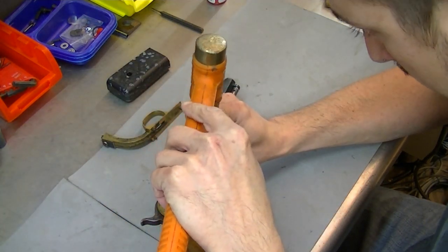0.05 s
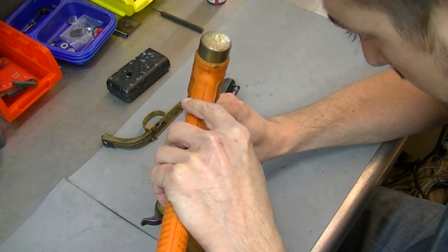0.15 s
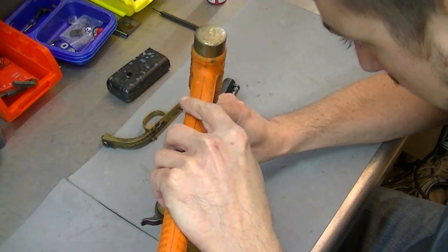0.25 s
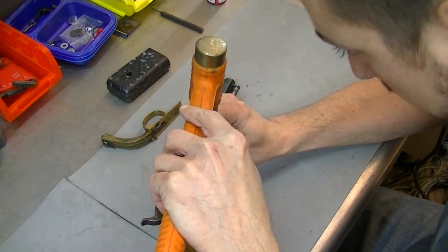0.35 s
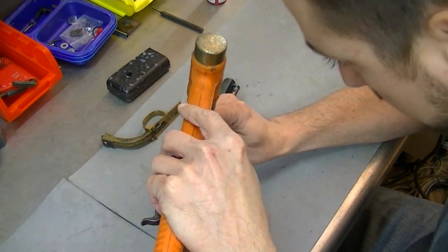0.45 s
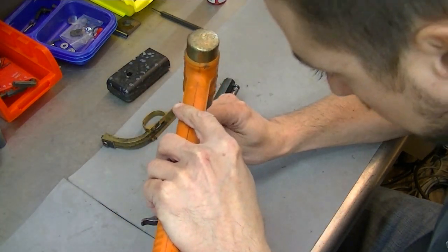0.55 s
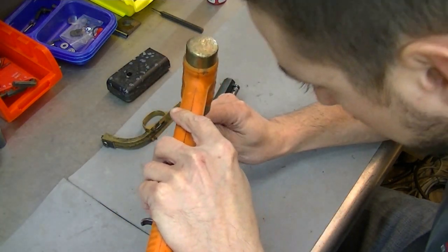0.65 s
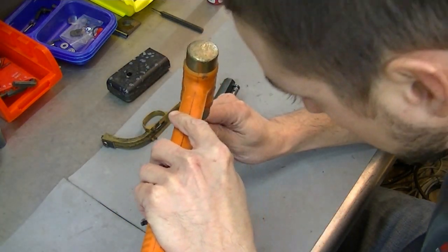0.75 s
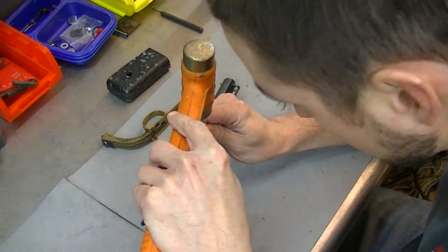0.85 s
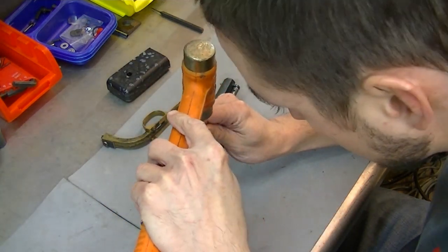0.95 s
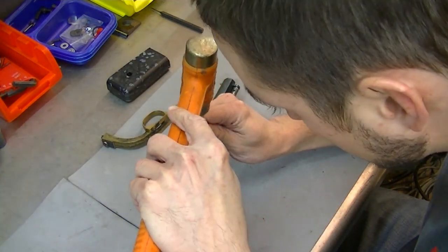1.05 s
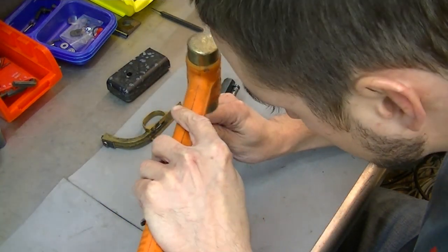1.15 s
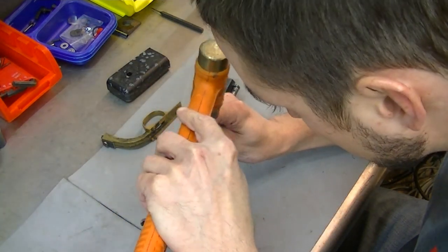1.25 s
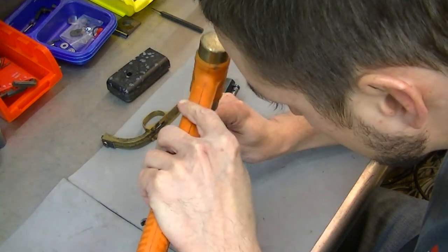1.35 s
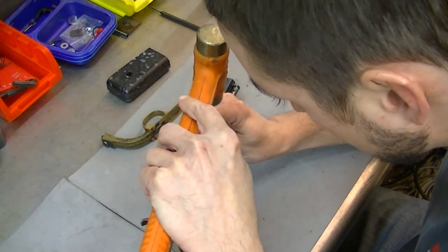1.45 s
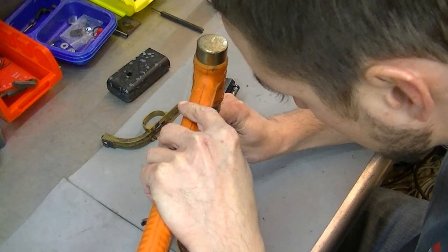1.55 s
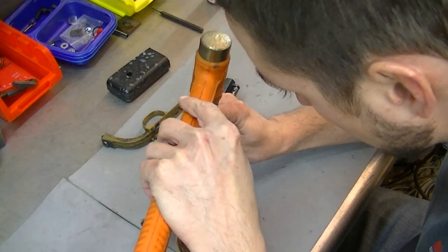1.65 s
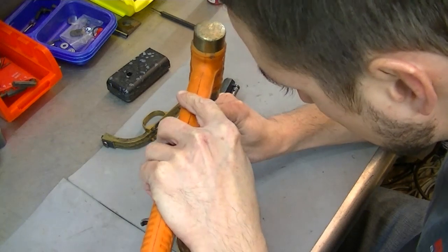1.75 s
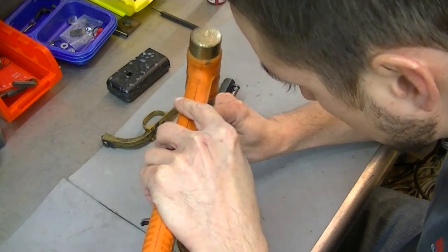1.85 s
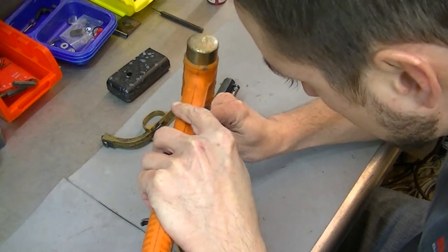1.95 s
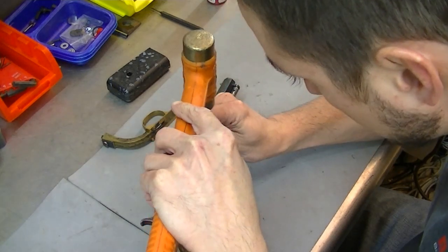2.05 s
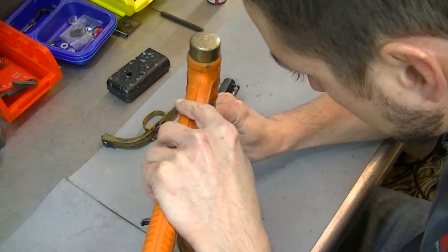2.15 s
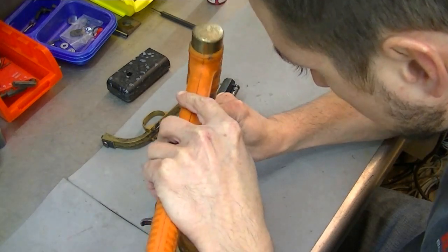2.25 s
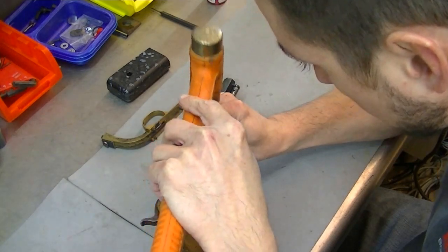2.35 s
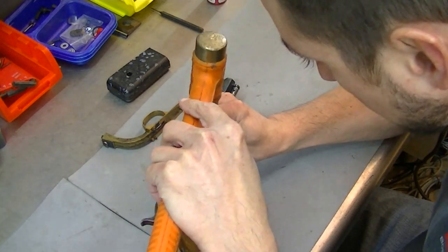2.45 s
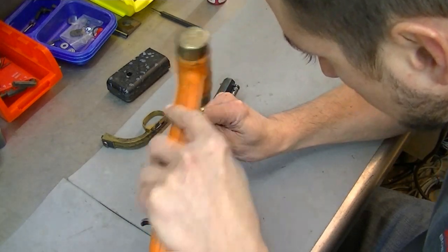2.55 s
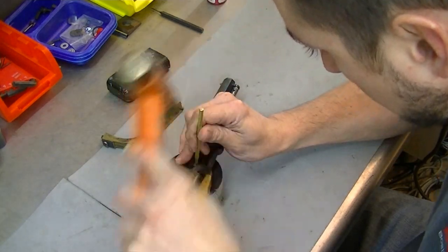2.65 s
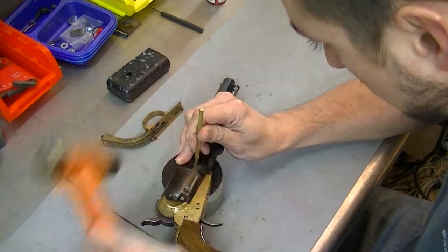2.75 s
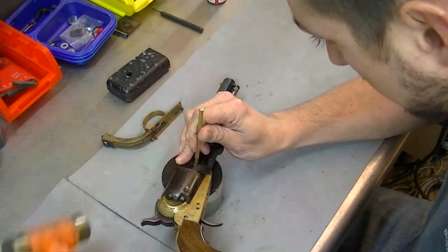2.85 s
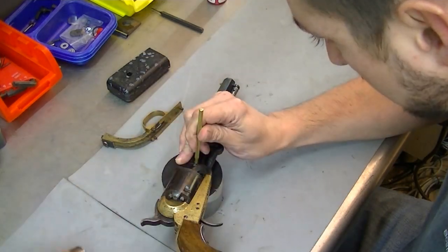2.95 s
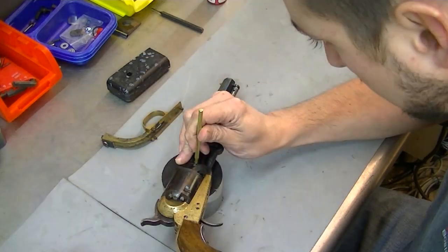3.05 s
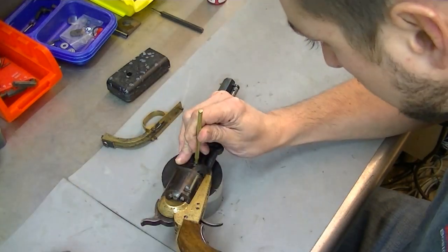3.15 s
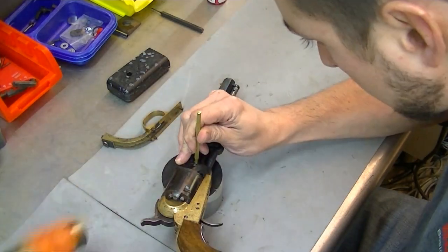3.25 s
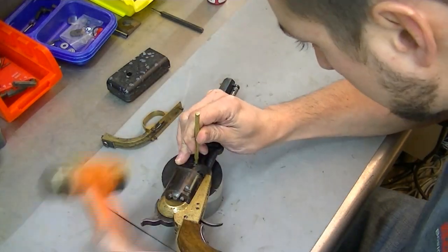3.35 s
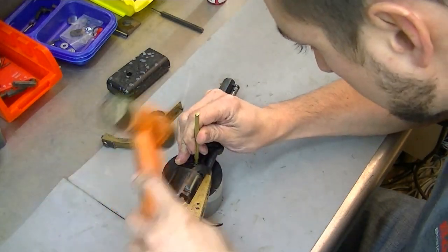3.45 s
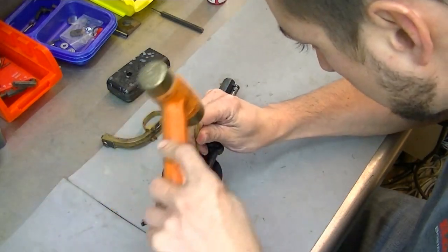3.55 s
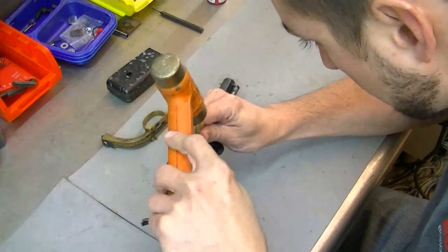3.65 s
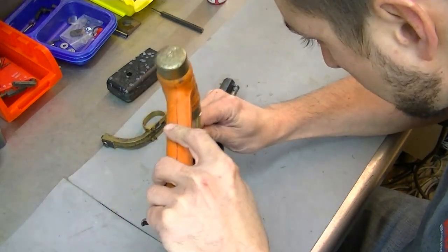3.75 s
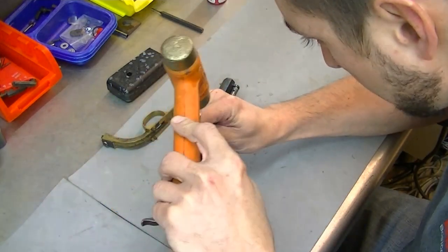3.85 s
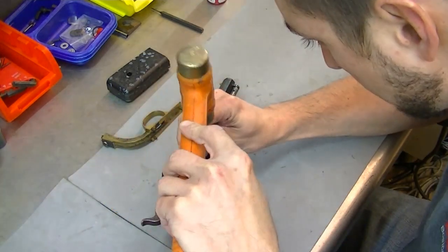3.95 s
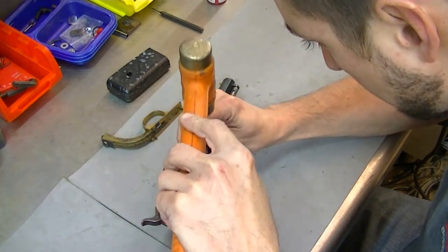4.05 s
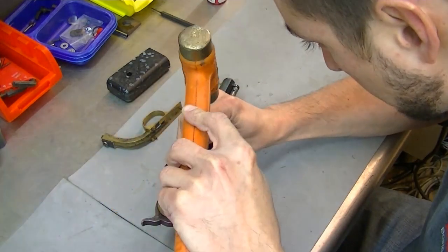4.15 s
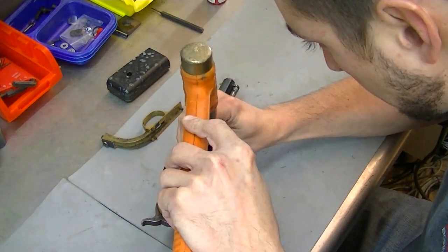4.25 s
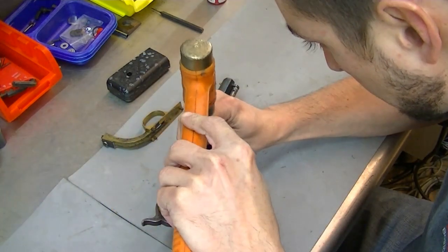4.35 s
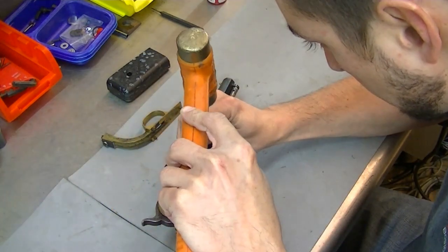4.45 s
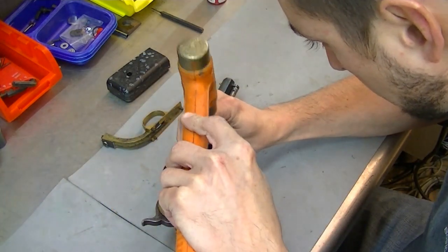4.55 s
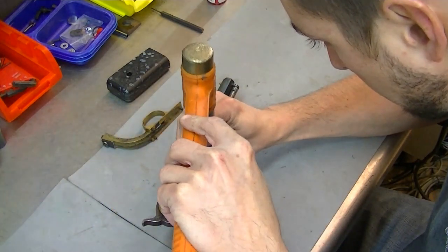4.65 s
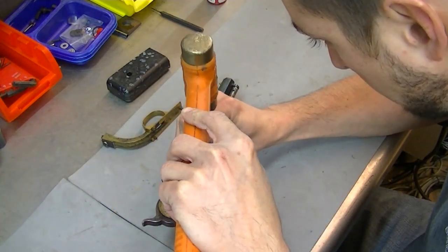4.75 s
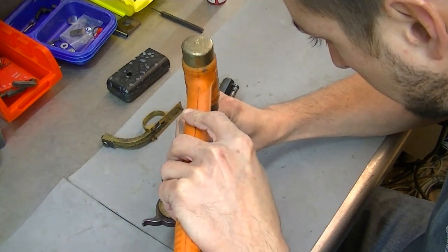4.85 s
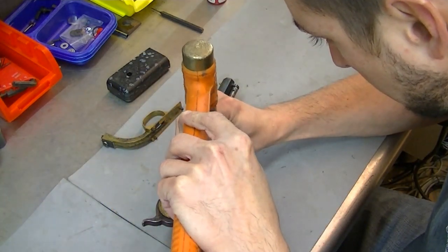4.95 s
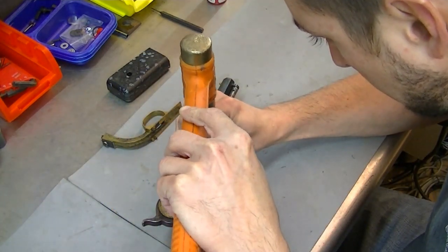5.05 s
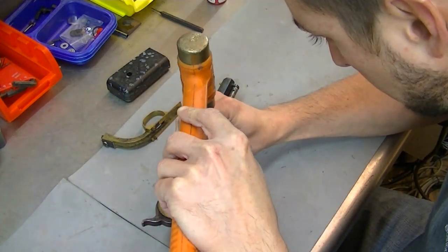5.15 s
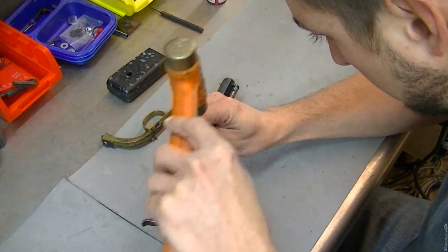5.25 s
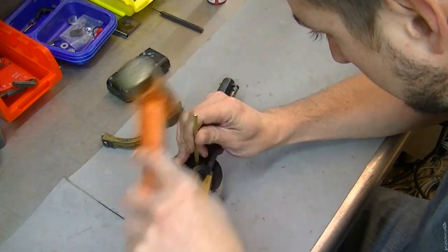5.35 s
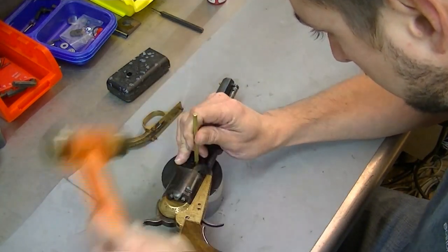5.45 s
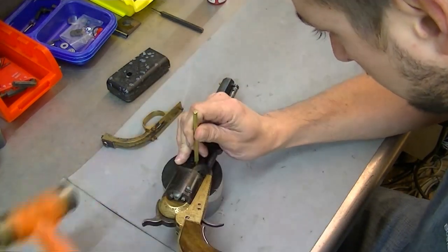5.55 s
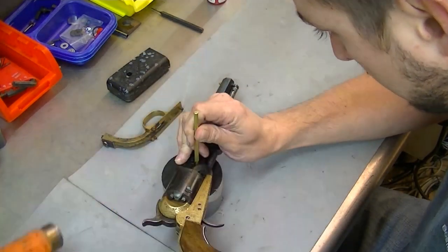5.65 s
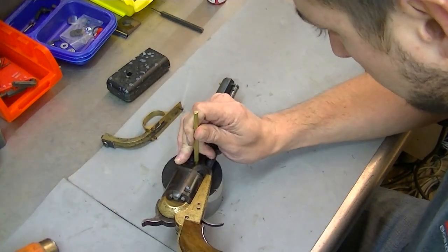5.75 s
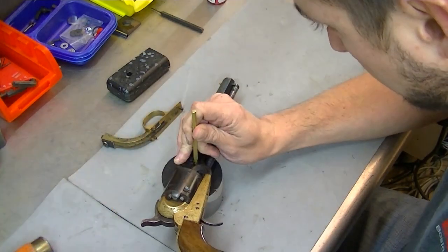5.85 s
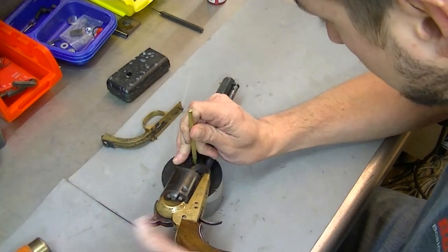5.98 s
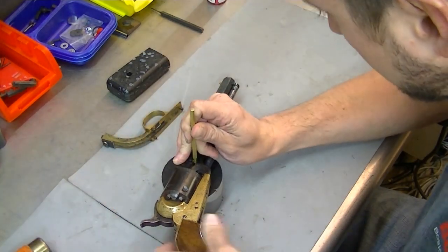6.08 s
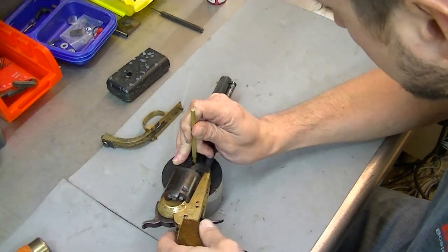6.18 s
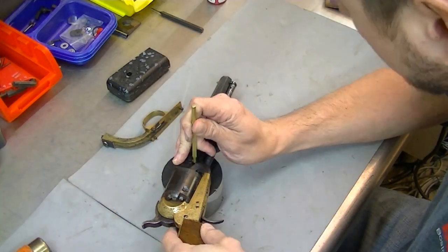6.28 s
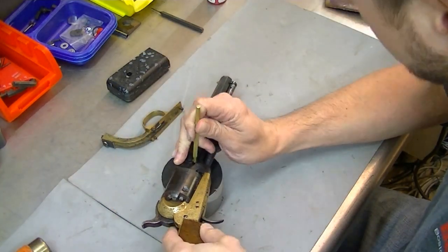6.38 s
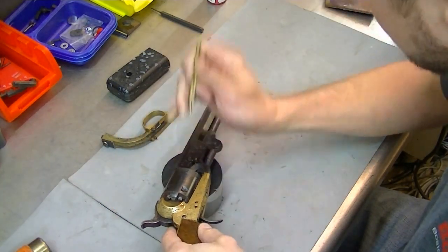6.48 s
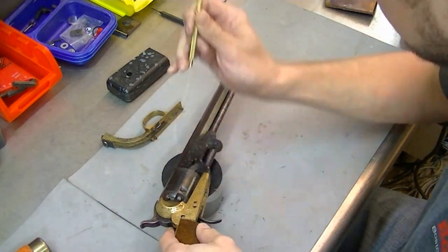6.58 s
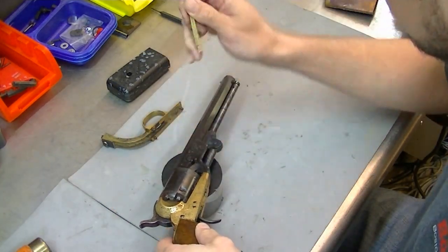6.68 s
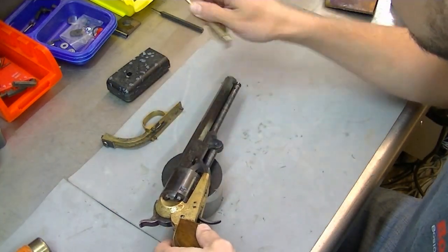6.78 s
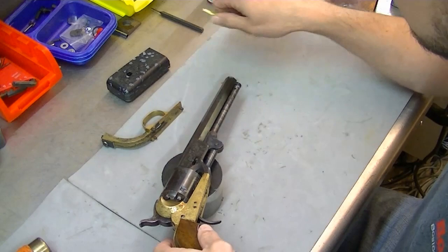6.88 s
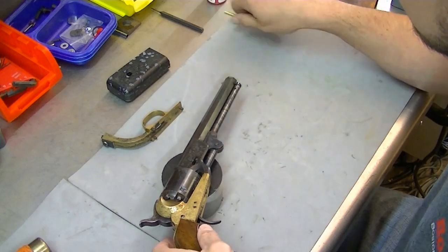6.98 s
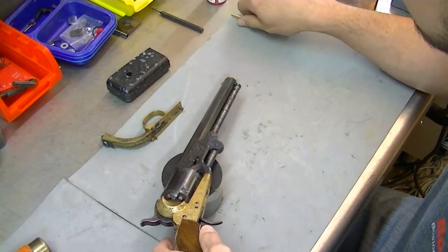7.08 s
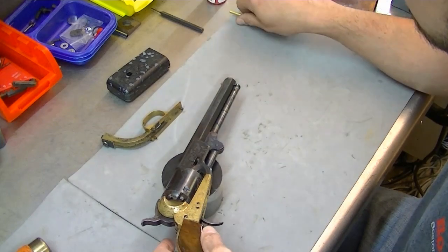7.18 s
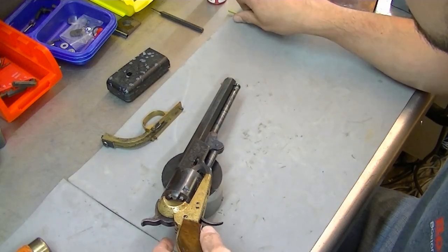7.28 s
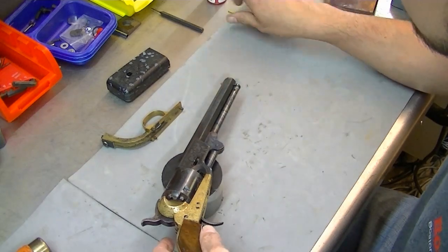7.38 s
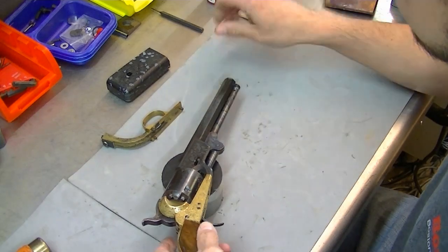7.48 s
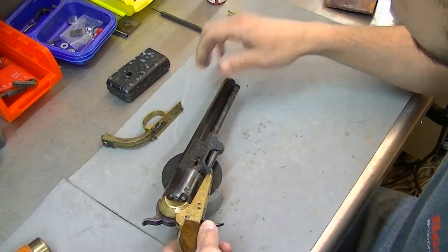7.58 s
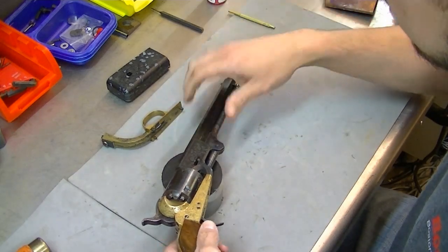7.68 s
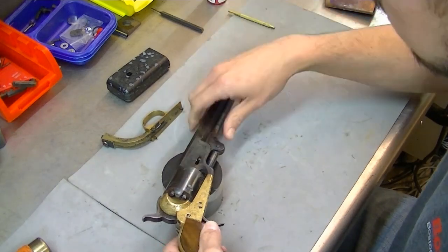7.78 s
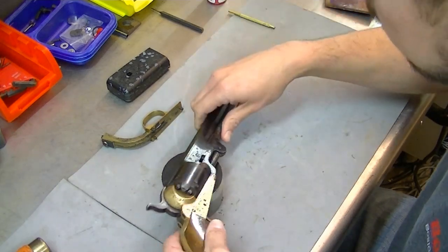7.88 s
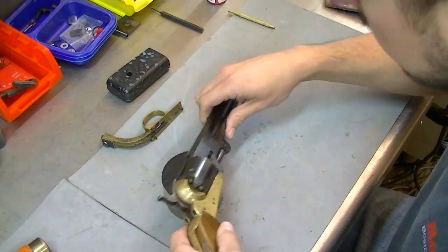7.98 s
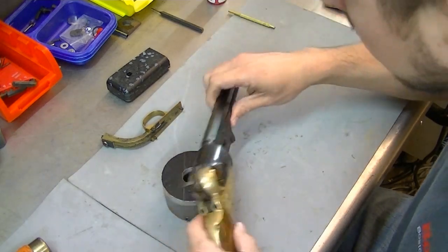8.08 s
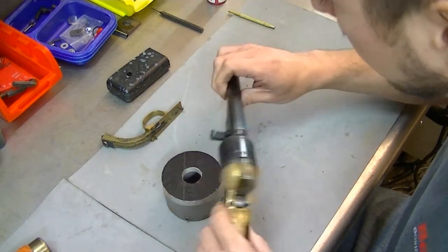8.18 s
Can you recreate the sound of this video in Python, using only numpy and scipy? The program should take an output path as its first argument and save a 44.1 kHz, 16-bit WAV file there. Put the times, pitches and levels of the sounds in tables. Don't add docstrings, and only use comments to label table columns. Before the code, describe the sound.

A close camera microphone in a small hard room picks up faint hiss and electric lamp buzz. The tail of an earlier strike is still dying as hard ringing hammer blows on a brass punch land at 0.06 and 0.4 s, thudding in the bench and rattling loose tools. A weak graze comes at 0.93, a firm ticking hit at 1.25, then strong clangs at 1.57 and 2.14 and a softer one at 2.43, with a loose part jingling as it bounces until 2.6. Near quiet follows, with a faint brush around 3.1. Lighter, clickier taps come at 3.67, 4.0, 4.3 and 4.63, with small jingles, then a fuller thud at 4.95. Slight handling scuffs at 5.8 lead into the hammer laid down with a hollow boom and rattle at 5.95, settling at 6.02. Soft taps follow at 6.2 and 6.45, then sliding rubs and a dull tap around 7.1-7.4, fading to background.

```python
import sys
import numpy as np
from scipy import signal
from scipy.fft import rfft, irfft
from scipy.io import wavfile
from scipy.ndimage import uniform_filter1d

SR = 44100
rng = np.random.default_rng(int(sys.argv[2]) if len(sys.argv) > 2 else 0)


def boost_factor(decibels):
    exponent = np.asarray(decibels, float) / 20
    return 10 ** exponent


def persist_wave(psi):
    counts = np.round(np.clip(psi, -1, 1) * 32767).astype(np.int16)
    wavfile.write(sys.argv[1], SR, np.atleast_2d(counts).T)


N = 362502
LEAD = SR // 2
T = np.arange(SR // 2) / SR
FULL_SHAKE_DB = -12


def evened(x):
    return x / np.sqrt(np.mean(x ** 2) + 1e-20)


def read(points, hz):
    f, value = np.transpose(points)
    return np.interp(np.log(hz + 1), np.log(f + 1), value)


def coloured(x, points):
    gain = boost_factor(read(points, np.fft.rfftfreq(len(x), 1 / SR)))
    return evened(irfft(rfft(x) * gain, len(x)))


def add(mix, s, sound):
    part = mix[LEAD + round(s * SR):][:len(sound)]
    part += sound[:len(part)]


def struck(modes, spread_db, rise, shorter=1, favour_hz=None, favour_db=0):
    hz, db, t60 = np.transpose(modes)[:, :, None]
    level_luck, pitch_luck, phase_luck, rate_luck, throb_luck = rng.standard_normal((5, len(hz), 1))
    db = db + spread_db * level_luck
    if favour_hz:
        db = db + favour_db * np.exp(-(np.log(hz / favour_hz) / 0.26) ** 2)
    t = T[:round(t60.max() * shorter * SR)]
    flutter_db, flutter_hz = 4, 45 * 2 ** (rate_luck / 2)
    db = db + flutter_db * np.sin(2 * np.pi * flutter_hz * t + 3 * throb_luck)
    pitch = hz * (1 + 0.00386 * pitch_luck)
    ring = boost_factor(db - 60 * t / (t60 * shorter)) * np.sin(2 * np.pi * pitch * t + 3 * phase_luck)
    ring = ring.sum(0) * (1 - np.exp(-t / rise))
    return np.pad(ring / abs(ring).max(), (0, len(T) - len(t)))


# (frequency [Hz], density [dB per Hz])
TOOL_COLOUR = [(100, -48), (250, -14), (600, -3), (1200, -5.5), (6000, -11), (9000, -18.5), (12000, -25),
               (15000, -30.5)]


def clatter(t60, rise, clumps_db, points=TOOL_COLOUR, tilt_db=0):
    clumps = evened(uniform_filter1d(uniform_filter1d(rng.standard_normal(len(T)), 60), 60))
    colour = [(hz, db + tilt_db * np.log2(hz / 3000)) for hz, db in points]
    knocks = coloured(rng.standard_normal(len(T)), colour)
    swell_db = clumps_db * 2 * np.tanh(clumps / 2)
    return knocks * boost_factor(swell_db - 60 * T / max(t60, .003)) * (1 - np.exp(-T / rise))


# (time [s], thud level [dB], thud pitch [Hz], ring level [dB], shake level [dB])
BLOWS = [(0.0616, -26.5, 554, -22, -13.5), (0.3895, -25.5, 586, -21.5, -12.5),
         (0.9277, -30, 539, -35.5, -24.5), (1.2527, -30.5, 793, -32.5, -14.5),
         (1.5677, -25.5, 542, -20.5, -10), (2.1381, -23.5, 576, -19, -13.5), (2.4254, -30, 584, -26, -13),
         (3.6675, -32.5, 743, -47.5, -25.5), (4.011, -36.5, 563, -36.5, -15), (4.0294, -44, 869, -34, -20),
         (4.2992, -35, 643, -45.5, -24.5), (4.631, -44.5, 574, -48, -29), (4.6554, -35, 442, -43, -20.5),
         (4.9533, -22.5, 574, -33, -13), (5.9535, -30.5, 603, -35.5, -10.5),
         (6.0196, -32, 309, -38.5, -14.5)]
EARLIER_BLOW = (-0.18, -32, 480, -24, -14)
# (frequency [Hz], level [dB], t60 [s])
BENCH = [(200, -14, 0.09), (283, -27, .8), (307.2, -14, 0.17), (398.5, -1.5, 0.14), (443, -14, 1),
         (466.6, 4.5, 0.13), (521.4, -5.5, 0.21), (589.6, 0, .15), (672.7, 1, 0.092), (753.5, -1, 0.2),
         (869, -6, 0.077)]
# (frequency [Hz], level [dB], t60 [s])
FRAME = [(1056, -6.5, 0.07), (1198, 0, 0.11), (1400, -2, 0.012), (1528, -5.5, 0.073), (1846, -11.5, 0.031),
         (1985, 0.5, 0.065), (2396, -1.5, 0.031), (2870, -4.5, 0.06), (4200, -8.5, 0.04)]
# (frequency [Hz], level [dB], t60 [s])
PUNCH = [(3050, -6, .02), (3110, -2, .03), (3171, 0, .035), (3240, -4, .02), (3313, -1, .025),
         (3388, -2, .02), (3470, -5, .02), (3560, -7, .015)]


def blow(thud_db, thud_hz, ring_db, shake_db):
    less = shake_db - FULL_SHAKE_DB
    board = [(thud_hz, 9, .12), (thud_hz * 1.06, 5, .08), (thud_hz * .93, 4, .08)]
    thud = boost_factor(thud_db + 5) * struck(BENCH + board, spread_db=2.5, rise=0.0013)
    knock = boost_factor((thud_db + shake_db) / 2 - 6) * struck(FRAME, spread_db=2, rise=.0015)
    ring = boost_factor(ring_db + 6.5) * struck(PUNCH, spread_db=3.5, rise=.003)
    crack = boost_factor(-18 + 1.36 * less) * clatter(t60=.015, rise=.001, clumps_db=-1.5, tilt_db=0.13 * less)
    return thud + knock + ring + crack + chatter(shake_db)


# (time [s], level [dB], strongest pitch [Hz])
TICKS = [
    (0.9293, -31.5, 2920),
    (1.2527, -17, 3260),
    (3.6679, -21.5, 4070),
    (4.011, -20.5, 4250),
    (4.2999, -14, 3030),
    (4.366, -29, 2930),
    (4.6311, -14.5, 4360),
    (5.817, -43, 5000),
]
# (frequency [Hz], level [dB], t60 [s])
TIP = [(2506, -0.5, 0.0094), (3166, 2, 0.017), (4010, -1, 0.015), (5120, -5.5, 0.0033), (6150, -11, 0.012),
       (6840, -4, 0.027), (7300, -10.5, 0.0047), (8260, -16, 0.013)]


def tick(level_db, hz):
    less = max(level_db - FULL_SHAKE_DB, -14)
    modes = [(f, db + 0.03 * less * np.log2(f / 3000), t60) for f, db, t60 in TIP]
    modes.append((hz, 5, .012))
    click = clatter(t60=0.017, rise=.0004, clumps_db=-0.1, tilt_db=4.5 + .4 * less)
    tip = struck(modes, spread_db=4, rise=0.0002)
    return boost_factor(level_db - 3) * (tip + boost_factor(1 + 1.6 * less) * click)


# (time [s], shake level [dB])
CHATTERS = [
    (1.3458, -26),
    (1.6644, -19),
    (4.3202, -29.5),
    (4.3444, -33),
    (4.6653, -27),
    (5.9386, -23.5),
    (7.09, -45),
    (7.342, -34.5),
]


def chatter(shake_db):
    less = shake_db - FULL_SHAKE_DB
    t60 = 0.23 * 2 ** (max(less, -14) / 14)
    return boost_factor(shake_db - 11) * clatter(t60, rise=0.0028, clumps_db=4, tilt_db=max(0.13 * less, -6))


# (time [s], jingle level [dB])
BOUNCES = [(1.31, -30.5), (1.346, -29), (1.375, -34.5), (1.5844, -20), (1.7541, -30.5), (2.4464, -26),
           (2.4916, -23), (2.5299, -27.5), (2.5512, -28), (2.5881, -29), (2.6156, -32), (4.0735, -27.5),
           (4.1091, -25.5), (4.366, -25.5), (4.4072, -28), (4.4575, -41), (4.7113, -36), (4.7436, -35)]
# (frequency [Hz], level [dB], t60 [s])
PART = [(1303, -9, .04), (1997, -2, .04), (2955, -5, .04), (4290, -5, .035), (4560, -5, .05),
        (5200, -8, .03), (5884, -8, .03), (6051, -4, .04), (7407, -11, .03), (8183, -14, .03),
        (9889, -13, .025), (11990, -20, .025), (13150, -18, .025), (14140, -20, .03)]


def bounce(jingle_db):
    jingle = boost_factor(jingle_db) * struck(PART, spread_db=3, rise=0.0022)
    return jingle + boost_factor(jingle_db - 4) * clatter(t60=0.054, rise=0.0023, clumps_db=1.5, tilt_db=1.5)


# (time [s], thump level [dB])
LANDINGS = [
    (5.9535, -26),
    (6.0196, -39.5),
]
# (frequency [Hz], level [dB], t60 [s])
PLANK = [(93.3, -7.5, 0.16), (131, -2.5, 0.15), (182, -5, 0.15), (248, -3, 0.099), (293, -0.5, .2),
         (304, 6.5, 0.16), (321, 2.5, 0.14), (603, 4, 0.15)]


def landing(thump_db):
    return boost_factor(thump_db) * struck(PLANK, spread_db=0.5, rise=0.0028)


# (time [s], tap level [dB], tap pitch [Hz], scuff level [dB])
TOUCHES = [(0.945, -33.5, 805, -76), (1.2527, -21, 1185, -60), (3.16, -60.5, 2060, -65),
           (3.72, -38.5, 700, -67), (3.785, -49.5, 755, -73), (4.892, -58, 474, -60),
           (5.383, -51, 436, -78), (5.797, -61, 570, -71), (5.818, -48.5, 583, -57),
           (5.841, -44, 1910, -55), (5.877, -57, 370, -44), (6.184, -42, 300, -56), (6.352, -58, 380, -63),
           (6.455, -41.5, 602, -55.5), (6.489, -59, 445, -56.5), (7.093, -58, 440, -59),
           (7.345, -38.5, 322, -53.5), (7.857, -70, 603, -56.5)]
# (frequency [Hz], density [dB per Hz])
SCUFF = [(1500, -11), (4000, -4.5), (8000, -4), (13000, -7.5), (16000, -3)]


def touch(tap_db, tap_hz, scuff_db):
    tap = struck(BENCH + FRAME, spread_db=0.5, rise=0.00028, shorter=0.49, favour_hz=tap_hz, favour_db=13.5)
    scuff = clatter(t60=.055, rise=0.0014, clumps_db=5, points=SCUFF)
    return boost_factor(tap_db + 2.5) * tap + boost_factor(scuff_db - 2.5) * scuff


# (time [s], length [s], level [dB])
SLIDES = [
    (3.1, .1, -76),
    (5.8, 0.16, -68),
    (7.085, .06, -64),
    (7.22, 0.19, -68.5),
]


def slide(length, level_db):
    rustle = clatter(t60=10, rise=0.00085, clumps_db=7, points=SCUFF, tilt_db=-2.5)
    return boost_factor(level_db) * rustle * np.sin(np.pi * np.minimum(T / length, 1))


# (frequency [Hz], t60 [s])
ROOM = [(150, 0.85), (500, 0.48), (1500, 0.43), (4000, 0.37), (8000, 0.29), (13000, 0.12)]


def room(x):
    taps = np.zeros((2, SR))
    at = np.arange(200, SR - 20, 20) + rng.integers(0, 20, (2, (SR - 201) // 20))
    np.put_along_axis(taps, at, rng.choice([-1., 1.], at.shape), 1)
    hz, t, z = signal.stft(taps, SR, nperseg=256)
    apart = boost_factor(read([(100, -9), (400, -23.5), (2000, -15), (8000, -10), (14000, 3.5)], hz))[:, None]
    z = np.array([z[0] + apart * z[1], z[0] - apart * z[1]])
    fading = z * boost_factor(-60 * t / read(ROOM, hz)[:, None])
    tail = signal.istft(fading, SR, nperseg=256)[1]
    return signal.fftconvolve(x[None], tail / np.linalg.norm(tail[0]), axes=1)


# (frequency [Hz], width [Hz], level [dB])
LAMPS = [(580, 40, -72.5), (1220, 50, -89.5), (2050, 185, -77), (2646, 100, -85.5), (3040, 75, -82),
         (3370, 160, -87), (4200, 290, -88)]


def lamps():
    ripple_hz = 120
    t = np.arange(2 * SR // ripple_hz) / SR
    hz = ripple_hz * np.arange(1, 41)[:, None]
    size = sum(boost_factor(db) / (1 + ((hz - f) / width) ** 2) for f, width, db in LAMPS)
    turn = 2 * np.pi * (hz * t + rng.random(hz.shape))
    lag = rng.normal(0, 0.13, hz.shape)
    buzz = np.sqrt(2) * (size * np.sin([turn, turn + lag])).sum(1)
    return np.tile(buzz, N // len(t) + 1)[:, :N]


# (frequency [Hz], density [dB per Hz])
HISS = [(18, -84), (30, -32), (272, -8.5), (1590, -11.5), (2120, -10.5), (3740, -13), (10600, -22.5),
        (14800, -27.5)]
# (frequency [Hz], likeness [-1 to 1])
HISS_SAME = [(60, 0.073), (240, 0.94), (930, 0.43), (3650, 0.68), (14400, 0.77)]


def hiss():
    frames, hz = N // 256 + 5, np.fft.rfftfreq(1024, 1 / SR)
    a, b, c, d, patches = rng.standard_normal((frames, 513, 5)).T
    patches = evened(uniform_filter1d(uniform_filter1d(patches, 12, 0), 14, 1))
    same = np.clip(read(HISS_SAME, hz), -1, 1)[:, None]
    left, other = a + 1j * b, c + 1j * d
    z = np.array([left, same * left + np.sqrt(1 - same ** 2) * other])
    z *= boost_factor(read(HISS, hz)[:, None] + 1.1 * patches)
    noise = signal.istft(z, nperseg=1024, noverlap=768)[1][:, :N]
    return boost_factor(-68.5) * evened(noise)


def scene():
    bench = np.zeros(N + LEAD)
    layers = [(BLOWS + [EARLIER_BLOW], blow), (TICKS, tick), (CHATTERS, chatter), (BOUNCES, bounce),
              (TOUCHES, touch), (LANDINGS, landing), (SLIDES, slide)]
    for table, sound in layers:
        for s, *controls in table:
            add(bench, s, sound(*controls))
    bench = signal.sosfilt(signal.butter(3, 150, "highpass", fs=SR, output="sos"), bench)
    wet = boost_factor(-5) * room(bench)[:, LEAD:LEAD + N]
    direct = bench[LEAD:] * boost_factor(np.array([[0.], [-.2]]))
    return direct + wet + lamps() + hiss()


# (frequency [Hz], step [dB])
COARSENESS = [(100, -20), (1000, -5.5), (4000, -6), (8000, -9), (10500, -5.5), (14500, -9), (14700, 42)]


def camera_rounding(x):
    size, start = 1024, 284
    n, k = np.arange(2 * size)[:, None] + .5, np.arange(size) + .5
    window = np.sin(np.pi * n / (2 * size))
    basis = window * np.cos(np.pi / size * (n + size / 2) * k) * np.sqrt(2 / size)
    front = 2 * size - start
    padded = np.pad(x, ((0, 0), (front, 2 * size - (front + N) % size)))
    halves = padded.reshape(len(x), -1, size)
    lines = np.concatenate([halves[:, :-1], halves[:, 1:]], axis=2) @ basis
    above_bass = lines[..., size // 20:]
    level_db = 10 * np.log10((above_bass ** 2).mean((0, 2)) + 1e-12)
    step = boost_factor(level_db[:, None] + 5 + read(COARSENESS, k * SR / (2 * size)))
    blocks = (np.trunc(lines / step + 0.51 * np.sign(lines)) * step) @ basis.T
    joined = blocks[:, 1:, :size] + blocks[:, :-1, size:]
    return joined.reshape(len(x), -1)[:, front - size:][:, :N]


def roll_off(x):
    return signal.sosfilt(signal.butter(12, 14960, fs=SR, output="sos"), x)


def record(dry):
    thin = signal.sosfilt(signal.butter(1, 60, "highpass", fs=SR, output="sos"), dry)
    mix = camera_rounding(thin)
    return roll_off(mix)


dry = scene()
out = record(dry)
persist_wave(out)
```